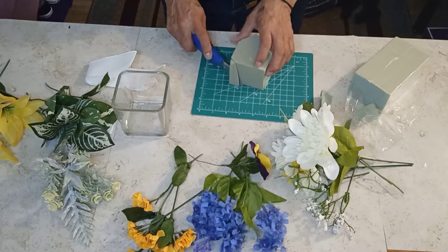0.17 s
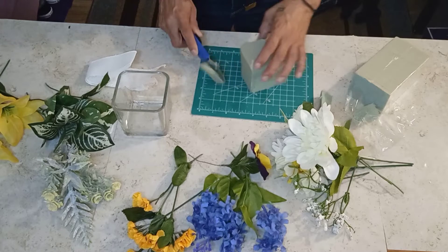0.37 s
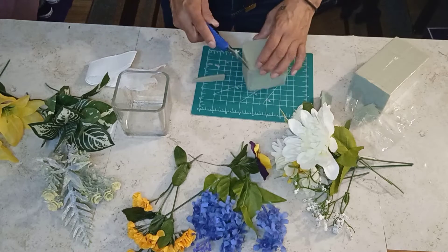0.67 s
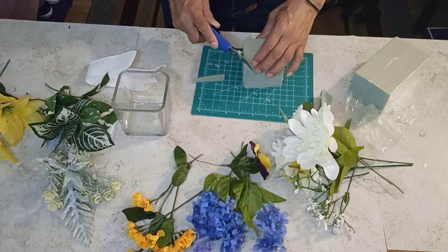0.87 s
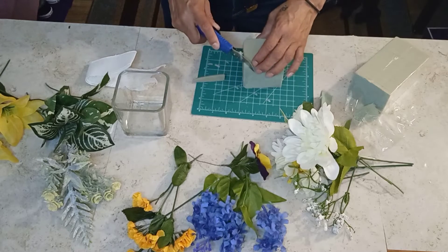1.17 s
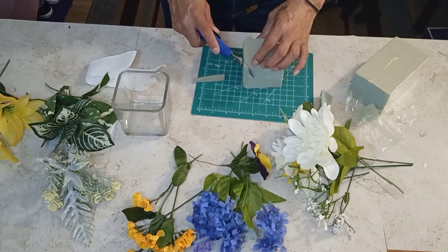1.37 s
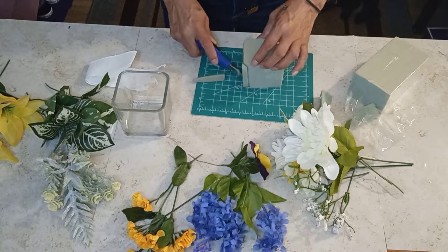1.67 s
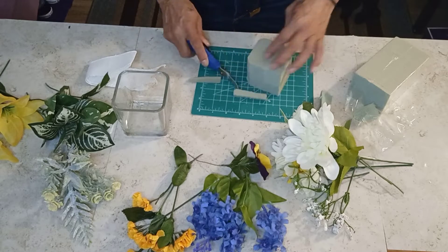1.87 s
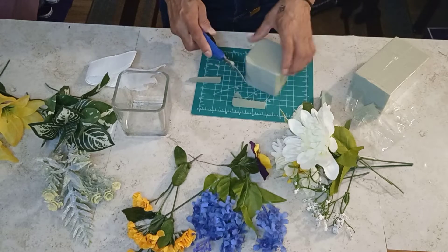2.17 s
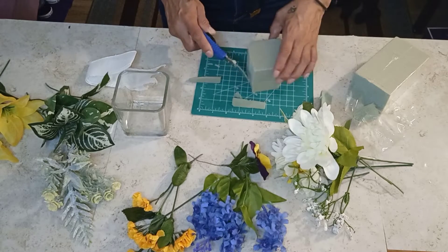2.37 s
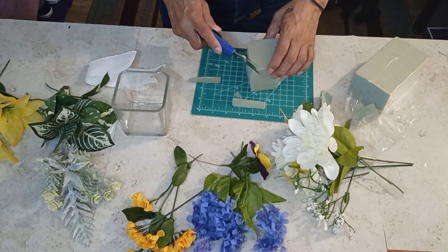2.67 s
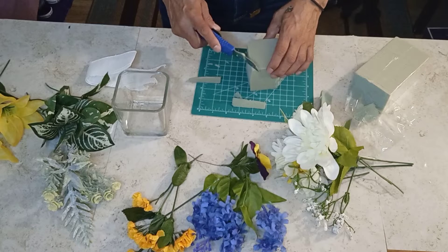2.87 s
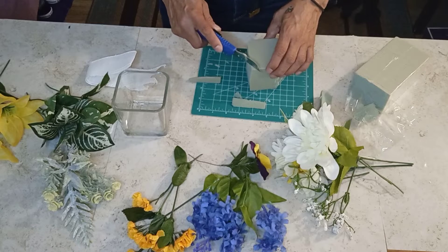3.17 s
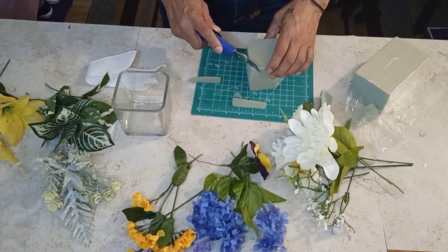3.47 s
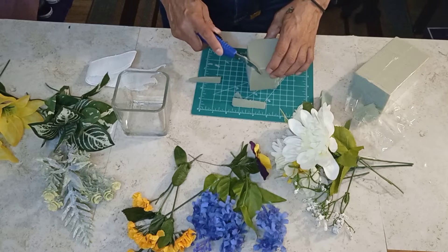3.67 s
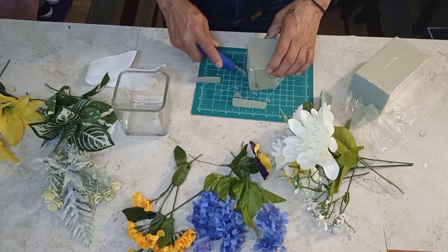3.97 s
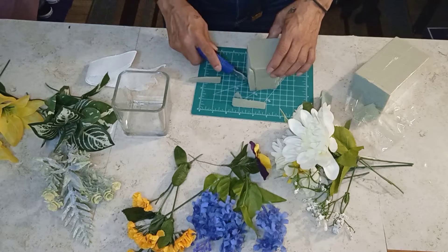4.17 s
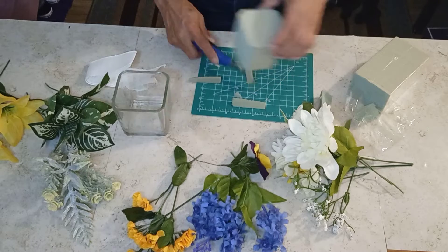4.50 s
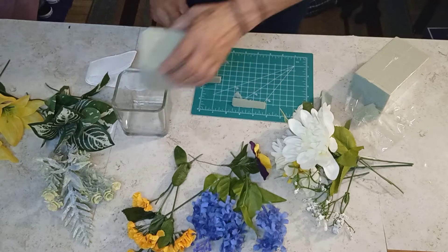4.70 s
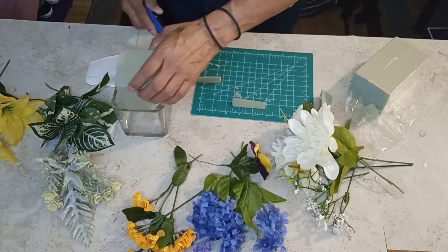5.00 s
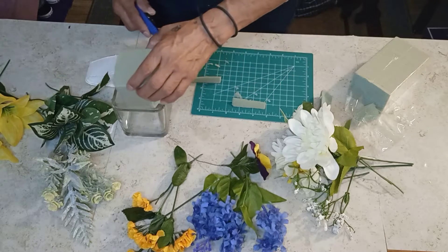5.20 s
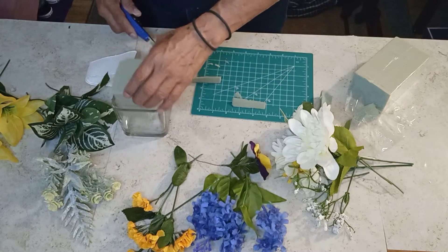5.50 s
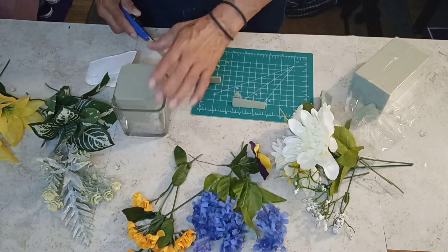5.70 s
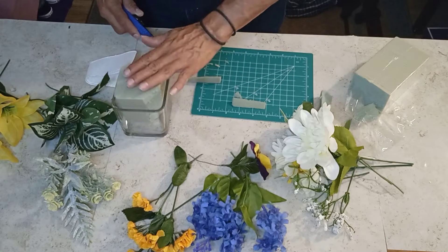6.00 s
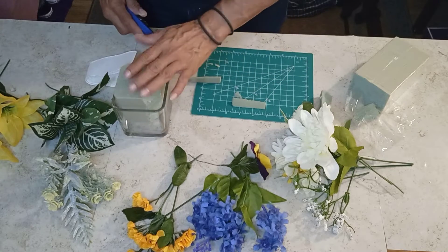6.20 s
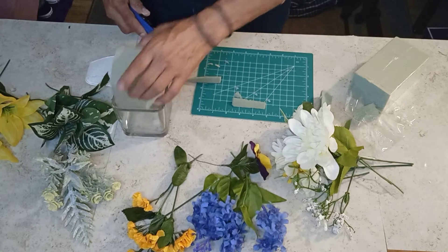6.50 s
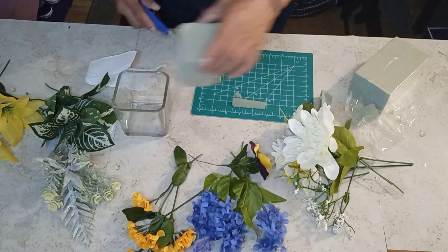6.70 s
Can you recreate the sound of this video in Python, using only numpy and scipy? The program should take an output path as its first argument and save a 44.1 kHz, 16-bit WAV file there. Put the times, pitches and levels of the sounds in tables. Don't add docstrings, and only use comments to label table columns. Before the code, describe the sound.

A close, bright sound of foam work at a table in a quiet room with faint low air noise. At 0 s a blade is already crunching through brittle foam, a dry hiss with sharp snaps near 0.1 and 0.2 s, and a short rasp at 0.35 s. Soft slides and scuffs follow until 1.2 s. From 1.26 to 1.75 s comes a dense, jerky, crackling cut with a squeaky resonance, ending in a woody knock at 1.7 s; scrapes follow to 1.95 s, and again at 2.25-2.5 s. Light fumbling and tiny ticks fill 2.6-3.65 s. A second long crunch runs 3.7-4.2 s, with a knock at 4.1 s and a slide around 4.3 s. Small ringing taps sound at 4.5 and 4.65 s. From 5 s, very faint rubs on glass, with clearer scuffs and a knock near 5.65 s and again at 6.4-6.6 s, then near silence.

```python
import sys
import numpy as np
from scipy import signal
from scipy.fft import rfft, irfft
from scipy.io import wavfile
from scipy.ndimage import uniform_filter1d, map_coordinates

SR = 44100
rng = np.random.default_rng(int(sys.argv[2]) if len(sys.argv) > 2 else 0)


def transcribe(signal):
    frames = np.atleast_2d(signal).T
    limited = np.clip(frames, -1, 1)
    pcm = np.round(limited * 32767).astype(np.int16)
    wavfile.write(sys.argv[1], SR, pcm)


def volts(x):
    e = np.asarray(x, float) / 20
    return 10 ** e


N = 302085

# start in seconds, held in seconds, first level in dB,
# last level in dB.
CUTS = [(0, .038, -27, -32), (.045, .045, -37.5, -37.5), (.092, 0.047, -35.5, -44), (.32, .03, -43, -40),
        (.35, 0.034, -34, -33), (.385, .07, -31, -50), (1.256, .012, -32.5, -30), (1.27, .015, -34, -31.5),
        (1.286, 0.027, -28.5, -27), (1.322, .045, -34.5, -38.5), (1.372, .004, -41.5, -40),
        (1.376, .035, -29, -30), (1.412, 0.055, -28, -29.5), (1.455, .055, -29.5, -30.5),
        (1.51, .012, -38.5, -33), (1.524, 0.059, -30, -29.5), (1.595, .04, -30, -28.5),
        (1.64, .055, -32.5, -27.5), (1.7, .051, -32.5, -40), (1.892, 0.022, -30.5, -39.5),
        (1.915, .055, -33, -34), (3.692, .012, -33.5, -28.5), (3.708, .02, -35.5, -31.5),
        (3.729, 0.025, -27, -31), (3.762, .03, -29.5, -31), (3.79, 0.038, -28, -28),
        (3.828, .045, -26, -28.5), (3.878, .05, -34, -30.5), (3.93, .045, -32, -29),
        (3.976, .03, -28, -30.5), (4.012, 0.038, -28.5, -32), (4.05, 0.028, -30, -30),
        (4.08, .035, -34, -30.5), (4.122, 0.06, -34, -41.5)]
SLIDES = [(.158, 0.0019, -32, -37.5), (.186, 0.27, -40.5, -44.5), (.47, 0.11, -38.5, -56),
          (.56, 0.036, -42.5, -54.5), (.608, 0.034, -55.5, -58), (.73, 0.013, -57, -46.5),
          (.756, 0.15, -38.5, -40), (.93, 0.032, -56.5, -56.5), (.975, 0.061, -53, -65.5),
          (1.04, 0.075, -57.5, -69.5), (1.14, 0.076, -73.5, -58.5), (1.21, 0.16, -47, -54.5),
          (1.772, 0.0055, -38, -46), (1.792, .008, -25, -31), (1.8, 0.11, -35, -30.5),
          (2.243, 0.017, -48, -39), (2.269, 0.1, -34, -36), (2.374, .035, -31, -36),
          (2.405, 0.085, -36, -57), (4.211, 0.054, -53.5, -48.5), (4.292, 0.059, -40, -36),
          (4.342, 0.12, -36.5, -53)]
TOUCHES = [(2.602, 0.023, -51, -47.5), (2.63, 0.067, -47.5, -58.5), (2.69, 0.015, -49.5, -49),
           (2.73, .05, -66.5, -49), (2.785, .07, -45.5, -58.5), (2.876, 0.0048, -58.5, -49.5),
           (2.9, 0.064, -62.5, -62), (2.975, 0.052, -51.5, -49), (3.09, 0.099, -45, -59),
           (3.272, 0.08, -46, -72.5), (3.617, .01, -65.5, -62.5), (3.635, 0.082, -63, -53),
           (4.506, 0.099, -53.5, -76), (4.58, 0.073, -67.5, -59.5), (4.648, 0.014, -53, -69),
           (4.675, 0.032, -66, -60.5), (4.86, .06, -75, -82), (4.925, 0.013, -69.5, -58.5)]
RUBS = [(5.04, .055, -59.5, -66.5), (5.13, .025, -64, -56), (5.16, .035, -58.5, -70),
        (5.204, .025, -55.5, -58.5), (5.232, .06, -49, -67), (5.29, .06, -66.5, -68.5),
        (5.3516, .04, -62, -68), (5.39, .06, -63.5, -69.5), (5.455, .025, -65.5, -67.5),
        (5.54, .04, -61, -69.5), (5.584, .025, -59, -64.5), (5.605, .02, -64.5, -55),
        (5.627, .012, -50, -43), (5.64, .02, -43, -47), (5.66, .015, -50.5, -43), (5.676, .03, -41, -53),
        (6.04, .03, -75, -57.5), (6.13, .04, -65, -66), (6.175, .042, -67, -53.5),
        (6.268, .0079, -66, -58.5), (6.414, .04, -42, -42), (6.455, .055, -47.5, -59.5),
        (6.515, .012, -52, -45.5), (6.528, .028, -40, -48), (6.56, .018, -42, -44),
        (6.58, .05, -49.5, -53.5), (6.635, .08, -61, -75.5), (6.803, .004, -73, -81.5)]
# rasp, air, block, boards and frame, all in dB re its hiss.
CUT_SHARES = (-4, -6, -13, -21, -32)
SLIDE_SHARES = (-4, -5, -23, -31.5, -42)
TOUCH_SHARES = (-3.5, -6.5, -35, -30, -35.5)
RUB_SHARES = (-3.5, -1, -67, -34, -39)
ATTACK_DB_PER_S = 6003
# hiss, rasp, air, block, boards and frame in dB per second.
RELEASE_DB_PER_S = (430, 400, 560, 430, 430, 430)
DULLING = (0.12, 0, 0.34, 0, 0, 0)
# time in seconds, brightness in dB.
GRAZE = [(0, 4), (.3, -3), (.6, 0), (1.05, -1.5), (1.351, -1.5), (1.65, 4), (1.999, -4.5), (2.4, 1),
         (2.7, 0), (3.202, -1), (3.75, -5), (4, 3.5), (4.4, 0), (5.1, 0), (5.3, -6.5), (5.5, -7.5),
         (5.64, 3.5), (6.151, -7.5), (6.42, 0), (6.49, -6.5), (6.56, 6), (6.66, -8)]
RASP_PER_GRAZE = -0.5

FOAM_ZONES_HZ = [900, 1900, 4500, 8000, 12500, 17000]
# frequency in Hz, density in dB per Hz.
FOAM_SPECTRUM = [(470, -36), (800, -4), (1130, -15.5), (1770, -15), (2330, -5.5), (2900, -5), (4400, -2),
                 (5600, 2.5), (6500, 3), (7100, 0), (7900, -11), (8900, -2.5), (11000, -8), (13600, -19)]
# frequency in Hz, width in Hz, level in dB.
BLOCK_MODES = [(995.4, 66, -7.5), (2206, 18, 0), (2400, 52, -23.5), (3080, 150, 2), (5300, 26, -7.5),
               (6335, 210, 17)]
# time in seconds, pitch re rest in percent.
MODE_SHIFT = [(0, 2), (.4, 0), (1.26, -1), (1.33, 4), (1.38, -1), (1.491, 2), (1.54, -3), (1.6, 2),
              (1.9, 3), (2.4, 0), (3.7, 0), (3.85, 3.5), (3.92, -1), (4.02, 1), (4.11, -6), (4.4, 0),
              (6.85, 0)]
# time in seconds, fizz re air in dB.
GRIT = [(0, -2.5), (1, -3), (1.6, -0.5), (2.3, -1.5), (3, -2), (3.9, 1.5), (4.6, -0.5), (5.1, -5.5),
        (5.4, -9), (5.66, -7), (6.15, -0.5), (6.45, -2.5), (6.6, 0)]
SKIRT_HZ = (1500, 2100)
SKIRT_DB = -21.5

# start in seconds, peak in dB, air (9-14 kHz) in dB re peak,
# low (1.5-3.8 kHz) in dB re peak.
SNAPS = [(0.0947, -10.5, -49.5, -15), (0.1446, -38, -13, -14), (0.16, -26, -10, -12),
         (0.183, -4.5, -29, -7.5), (0.1884, -6, -18, -10), (0.474, -17, 0, -30), (0.5608, -35, -13, -10),
         (0.6077, -40, -14, -12), (0.643, -35, 6, -15), (1.257, -8, -20, -12.5), (1.7935, -9.5, -23, -8),
         (2.7862, -36.5, -26, -4), (2.8786, -46, -10, -25), (3.094, -24, -14, -15), (3.1512, -41, 9, -31),
         (3.271, -30.5, -19, -32), (3.62, -47, -9, -16), (3.696, -16, -20, -10), (4.294, -24, 11, -14.5),
         (4.336, -13, -8, -10), (4.5095, -44, -7, 10), (4.6525, -33, -20, 4), (1.6905, -20, -20, -1),
         (4.1135, -12, -20, 1), (1.629, -9, -10, -20.5), (3.9762, -11, -13.5, -1), (5.461, -52, 5, -22.5),
         (4.8194, -71, -11, 16.5), (5.045, -43, -15, -27), (5.234, -27.5, -11, -22),
         (5.6765, -20, -13, -35)]

# start in
# seconds, held in seconds, frequency in Hz, width in Hz, level in dB.
HUMS = [(.63, 0.025, 936, 60.3, -62), (1.211, .44, 957, 70, -66), (1.261, 0.068, 3110, 250, -44),
        (1.39, 0.14, 3110, 250, -34), (1.52, 0.064, 2450, 400, -38.5), (1.6, .06, 3220, 200, -48),
        (3.72, 0.16, 2320, 301, -39), (3.95, .1, 2330, 400, -41), (3.96, .13, 5460, 300, -41),
        (1.89, .07, 3180, 199, -44), (5.23, 0.0085, 262, 115, -45.5), (5.68, 0.025, 470, 130, -43),
        (2.137, 0.039, 1470, 148, -75), (2.205, 0.01, 2450, 300, -58.5), (3.617, 0.0051, 3120, 450, -53),
        (3.618, 0.012, 5080, 502, -55.5), (4.512, 0.038, 1500, 300, -63.5), (4.665, 0.035, 1890, 200, -57),
        (4.69, 0.13, 1770, 80, -71), (0.63, 0.03, 1750, 400, -59), (4.7, 0.12, 1528, 69.6, -66.5),
        (5.29, 0.17, 1600, 151, -70), (5.452, 0.012, 1840, 730, -63), (5.526, 0.12, 1180, 150, -73.5),
        (6.0, 0.096, 1166, 101, -76), (6.054, 0.17, 549, 59, -64.5), (6.429, 0.014, 577, 90, -49.5),
        (6.561, 0.067, 540, 90, -62.5),
        (0.618, 0.05, 598, 113, -64.5), (0.802, 0.12, 1030, 130, -65), (.84, 0.082, 520, 138.9, -65),
           (2.171, .04, 638, 120, -70), (3.169, 0.019, 860, 150, -80), (4.81, 0.053, 700, 206, -74.5),
           (4.861, 0.037, 3530, 111.1, -73.5), (5.23, .12, 716, 108, -92), (5.36, 0.089, 324.1, 150, -72),
           (5.74, .07, 1286, 150, -82.5), (5.51, 0.094, 1610, 300, -69), (5.689, 0.11, 543, 185.2, -76),
           (5.668, 0.031, 201, 82, -47), (4.125, .06, 90, 40, -50), (5.06, .06, 85, 40, -60),
           (5.24, .05, 85, 40, -60), (3.088, .02, 2000, 300, -52)]
# start in seconds, frequency in Hz, peak in dB, t60 in seconds.
TAPS = [
    (4.5083, 1560, -51.5, .06),
    (4.5083, 2790, -53, 0.098),
    (4.5083, 4533, -52, .09),
    (4.6505, 1657, -55, .4),
    (4.6505, 1730, -53, 0.2),
    (4.6505, 1964, -41.5, .08),
    (4.6505, 2520, -48, .025),
    (4.6505, 2900, -54, 0.097),
    (4.659, 2000, -48.5, 0.11),
    (4.659, 2470, -49, .03),
]

# start in seconds, swell in seconds, boards in dB, frame in dB,
# block in dB.
THUDS = [(0, 0.0008, -52, -66, -42), (0.046, 0.03, -33, -39.5, -42), (.183, 0.079, -58.5, -50.5, -52.5),
         (0.346, 0.033, -36.5, -37.5, -51.5), (0.471, 0.0078, -45.5, -50, -64),
         (1.692, 0.03, -32.5, -41.5, -39), (1.891, 0.061, -41, -44, -42.5), (2.136, 0.014, -68, -87, -67),
         (3.09, 0.019, -75, -68, -79), (4.114, 0.036, -31.5, -40, -40), (4.506, 0.065, -66, -91, -81),
         (4.649, 0.013, -66, -80, -69), (5.04, 0.018, -73.5, -52, -98), (5.23, 0.037, -58.5, -48.5, -90),
         (5.451, 0.019, -75, -67, -63), (5.612, 0.0096, -74.5, -52.5, -72), (5.668, 0.027, -75, -62, -85),
         (6.041, 0.26, -73.5, -78, -83), (6.419, 0.045, -48, -71, -63), (6.56, 0.073, -67, -62.5, -91)]
# boards, frame and block in dB.
SWELL_DB = (1, 13.5, 5.5)
# boards, frame and block in dB per second.
SETTLE_DB_PER_S = (253.5, 272, 239)
# start in seconds, peak in dB, frequency in Hz.
LANDINGS = [
    (0.346, -41, 476),
    (1.6905, -22, 538),
    (1.6995, -27.5, 560),
    (4.1135, -20.5, 486),
    (4.1225, -30, 480),
    (5.233, -47, 270),
    (5.6765, -25, 480),
    (5.667, -35, 450),
    (6.438, -36, 560),
    (1.892, -32, 420),
]
# frequency in Hz, width in Hz, level in dB.
BOARD_MODES = [(322, 28, -5), (407, 27, -1), (415, 23, -1), (450, 70, -0.5), (562, 69, -4), (593, 17, -2.5),
               (649, 13, -0.5), (781, 61, -3)]
# frequency in Hz, width in Hz, level in dB.
FRAME_MODES = [(106, 7.9, 2.5), (158, 20, 0.5), (212, 65, -0.5)]

# frequency in Hz, density in dB per Hz.
AIR_SPECTRUM = [(15, -47), (25, -26), (86, -8.5), (146, -14), (211, -18.5), (400, -23.5), (700, -26),
                (1500, -31.5), (2500, -35), (3500, -35), (6500, -36), (7600, -49.5), (10000, -38.5),
                (13500, -53.5)]
AIR_DB = -74
PORT_HZ, PORT_WIDTH_HZ, PORT_DB = 15000, 1100, 11
TOP_HZ = 15900


def foam(block_db, rasp_db, hiss_db, air_db):
    per_s = np.clip(9000 * volts(0.7 * (hiss_db + 32)), 600, 9000)
    ring_db = np.clip(0.63 * (block_db - hiss_db + 18), -15, 0)
    cells, rung = [], []
    for k in range(2):
        bursts = grains(per_s, spread_db=2.5, clump_db=3.5)
        modes = sum(volts(5.12 * drift(3.1)) * dense_modes(bursts, t60=0.08) for j in range(2))
        cells.append(bursts + volts(3.5) * modes)
    for c in cells:
        block = rms_one(shifted(body(c, BLOCK_MODES, wander_db=4)))
        rung.append(rms_one(colour(c, FOAM_SPECTRUM)) + volts(-2.5 + ring_db) * block)

    patchy_db = np.clip(1.6 - 0.09 * (hiss_db + 35), 1.5, 5)
    fizz_db = air_db - 5.5 + np.interp(np.arange(N) / SR, *np.transpose(GRIT))
    levels = [block_db, rasp_db, hiss_db, air_db, fizz_db]
    out = 0
    for lo, hi, level_db in zip(FOAM_ZONES_HZ, FOAM_ZONES_HZ[1:], levels):
        edges = np.geomspace(lo, hi, 5)
        zone = 0
        for k in range(4):
            zone = zone + volts(patchy_db * drift(12)) * band(rung[k % 2], edges[k], edges[k + 1])
        out = out + volts(level_db) * evened(zone)
    out = out + volts(rasp_db + SKIRT_DB) * evened(band(cells[0][::-1], *SKIRT_HZ))
    return out * volts(1.1 * drift(27))


def contacts():
    kinds = [(CUTS, CUT_SHARES), (SLIDES, SLIDE_SHARES), (TOUCHES, TOUCH_SHARES), (RUBS, RUB_SHARES)]
    levels = []
    for k, release in enumerate(RELEASE_DB_PER_S):
        courses = [envelope_db(rows, release, DULLING[k]) + (0, *shares)[k] for rows, shares in kinds]
        levels.append(np.max(courses, axis=0))
    graze_db = np.interp(np.arange(N) / SR, *np.transpose(GRAZE))
    return np.array(levels) + np.outer([0, RASP_PER_GRAZE, 1, 0, 0, 0], graze_db)


def snaps():
    out, t = np.zeros(N), np.arange(600) / SR
    for s, db, air_db, low_db in SNAPS:
        burst = rng.standard_normal(len(t)) * volts(-60 * t / 0.0053)
        crack = band(burst, 3800, 8500)
        crack = crack + volts(air_db) * band(burst, 9000, 14000)
        crack = crack + volts(low_db + 4) * band(burst, 1500, 3800)
        at = round(s * SR)
        out[at:at + len(t)] += volts(db - 6.5) * crack / np.abs(crack).max()
    return out


def hums():
    out, noise = np.zeros(N), rng.standard_normal(N)
    for s, held, hz, width_hz, db in HUMS:
        near = slice(int((s - 0.1) * SR), int((s + held + 0.25) * SR))
        t = np.arange(N)[near] / SR - s
        fade_db = np.minimum(-30 * t - 400 * np.maximum(t - held, 0), 0)
        onset = np.clip(t / max(0.0017, 0.55 / hz), 0, 1)
        hum = rms_one(resonate(resonate(noise[near], hz, width_hz), hz, width_hz))
        out[near] += volts(db + fade_db) * onset * hum
    return out * volts(2.8 * drift(40))


def taps():
    out, t = np.zeros(N + SR), np.arange(SR // 2) / SR
    for s, hz, db, t60 in TAPS:
        out[round(s * SR):][:len(t)] += volts(db - 60 * t / t60) * np.sin(2 * np.pi * hz * t)
    return out[:N]


def thuds():
    levels = []
    for k in range(3):
        rows = [(s, swell, dbs[k] - SWELL_DB[k], dbs[k]) for s, swell, *dbs in THUDS]
        levels.append(envelope_db(rows, SETTLE_DB_PER_S[k]))
    return levels


def table(boards_db, frame_db):
    shake = grains(1500, spread_db=3.0, clump_db=2.5)
    boards = band(body(shake, BOARD_MODES, wander_db=3) + volts(-25) * shake, 270, 800)
    frame = band(body(shake, FRAME_MODES, wander_db=3), 97, 290)
    out = band(volts(boards_db) * evened(boards), 200, 1100)
    out = out + band(volts(frame_db) * evened(frame), 85, 330, order=3)
    for s, db, hz in LANDINGS:
        click = np.zeros(N)
        click[round(s * SR)] = volts(db + 36)
        knock = resonate(resonate(click, hz, 240), hz, 240)
        out += band(knock, hz * 0.41, hz * 1.3)
    return out


def room(x, t60=0.26, wet_db=-16):
    t = np.arange(SR // 3) / SR
    tail = rng.standard_normal(len(t)) * volts(-60 * t / t60) * (t > 0.004)
    dull = band(x, 100, 9000, order=1)
    return volts(wet_db) * signal.fftconvolve(dull, tail / np.linalg.norm(tail))[:N]


def still_air():
    noise = rms_one(colour(rng.standard_normal(N), AIR_SPECTRUM))
    return volts(AIR_DB + 0.52 * drift(28)) * noise


def grains(per_s, spread_db, clump_db):
    born = rng.random(N) < per_s * volts(clump_db * drift(60)) / SR
    size = volts(spread_db * np.minimum(rng.exponential(1, N), 5))
    return rms_one(born * size * rng.choice([-1, 1], N) / np.sqrt(per_s))


def dense_modes(x, t60):
    t = np.arange(SR // 5) / SR
    response = rng.standard_normal(len(t)) * volts(-60 * t / t60)
    return rms_one(signal.fftconvolve(x, response)[:N])


def resonate(x, hz, width_hz):
    r = np.exp(-np.pi * width_hz / SR)
    zeros = np.array([1, 0, -1]) * (1 - r * r) / 2
    poles = [1, -2 * r * np.cos(2 * np.pi * hz / SR), r * r]
    return signal.lfilter(zeros, poles, x + 1e-18)


def body(x, modes, wander_db):
    out = 0
    for k, (hz, width_hz, db) in enumerate(modes):
        out = out + (-1) ** k * volts(db + wander_db * drift(1.9)) * resonate(x, hz, width_hz)
    return out


def shifted(x):
    percent = np.interp(np.arange(N) / SR, *np.transpose(MODE_SHIFT)) + drift(8)
    return map_coordinates(x, [np.cumsum(1 + percent / 100)], order=3, mode="mirror")


def envelope_db(rows, release, dulling=0):
    t, out = np.arange(N) / SR, np.full(N, -110.)
    for s, held, first_db, last_db in rows:
        near = slice(max(int((s - 0.02) * SR), 0), int((s + held + 0.3) * SR))
        end_db = last_db + dulling * min(last_db - first_db, 0)
        course = np.interp(t[near] - s, [0, held], [first_db, end_db])
        before, after = np.maximum(s - t[near], 0), np.maximum(t[near] - s - held, 0)
        out[near] = np.maximum(out[near], course - ATTACK_DB_PER_S * before - release * after)
    return out


def evened(x, span_s=0.054):
    span = int(span_s * SR)
    power = uniform_filter1d(uniform_filter1d(x ** 2, span), span)
    return x / np.sqrt(power + 1e-20)


def rms_one(x):
    return x / np.sqrt(np.mean(x ** 2) + 1e-20)


def band(x, lo_hz, hi_hz, order=2):
    return signal.sosfilt(signal.butter(order, [lo_hz, hi_hz], "band", fs=SR, output="sos"), x)


def colour(x, spectrum):
    hz, level_db = np.transpose(spectrum)
    log_hz = np.log(np.fft.rfftfreq(4096, 1 / SR) + 1)
    log_gain = np.interp(log_hz, np.log(hz), level_db) * np.log(10) / 20
    folded = irfft(log_gain) * np.r_[1, 2 * np.ones(2047), 1, np.zeros(2047)]
    return signal.fftconvolve(x, irfft(np.exp(rfft(folded))))[:N]


def drift(rate):
    r = np.exp(-40 * np.pi * rate / SR)
    noise = rng.standard_normal(N // 20 + 2002)
    slow = signal.lfilter([1], [1, -2 * r, r * r], noise)[2000:]
    return np.interp(np.arange(N) / 20, np.arange(len(slow)), rms_one(slow))


def scene():
    hiss_db, rasp_db, air_db, block_db, boards_db, frame_db = contacts()
    boards_db, frame_db, block_db = np.maximum([boards_db, frame_db, block_db], thuds())
    cracks = snaps()
    mix = foam(block_db, rasp_db, hiss_db, air_db) + table(boards_db, frame_db)
    mix = mix + hums() + taps() + cracks + room(cracks) + still_air()
    return mix[None]


def low_pass(x):
    return signal.sosfilt(signal.butter(12, 17110, fs=SR, output="sos"), x)


def record(dry):
    port = resonate(resonate(dry, PORT_HZ, PORT_WIDTH_HZ), PORT_HZ, PORT_WIDTH_HZ)
    bright = dry + volts(PORT_DB) * port
    steep = signal.ellip(10, 1, 70, TOP_HZ, fs=SR, output="sos")
    return low_pass(signal.sosfilt(steep, bright))


dry = scene()
out = record(dry)
transcribe(out)
```